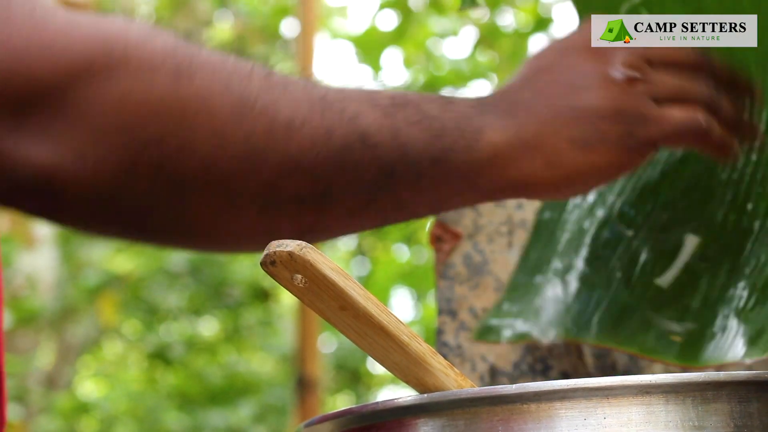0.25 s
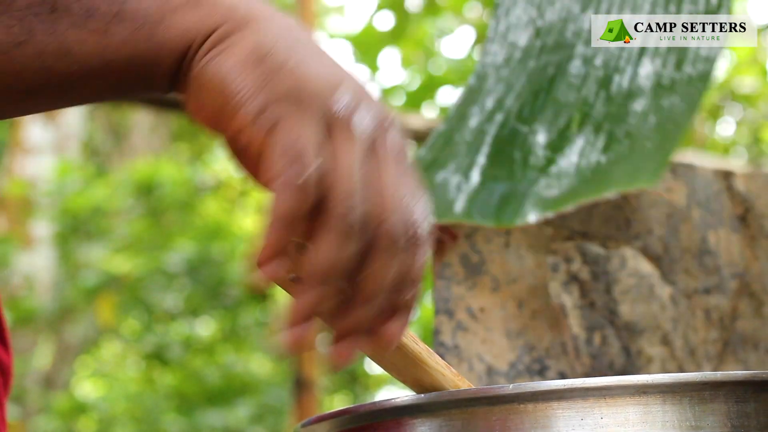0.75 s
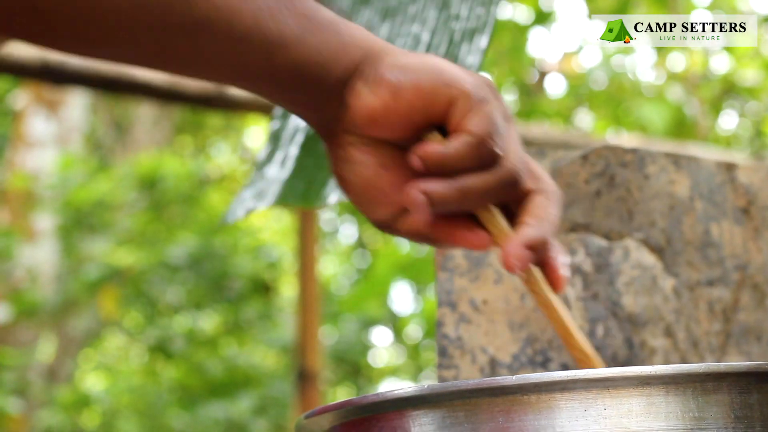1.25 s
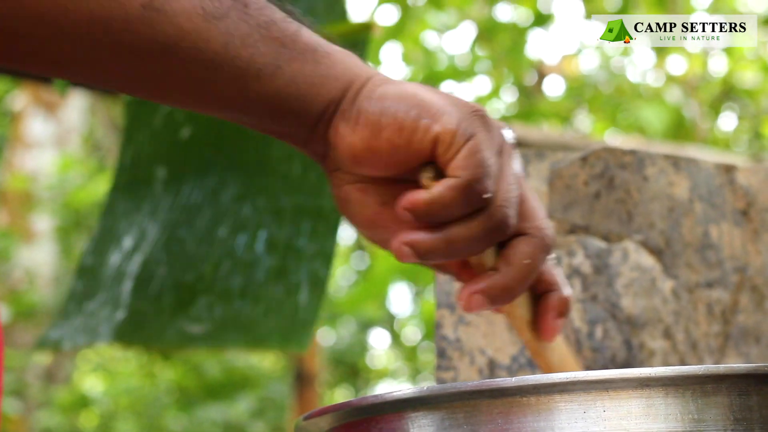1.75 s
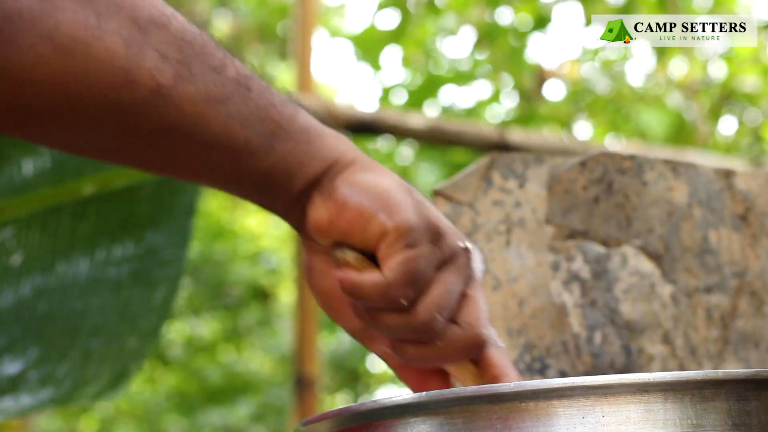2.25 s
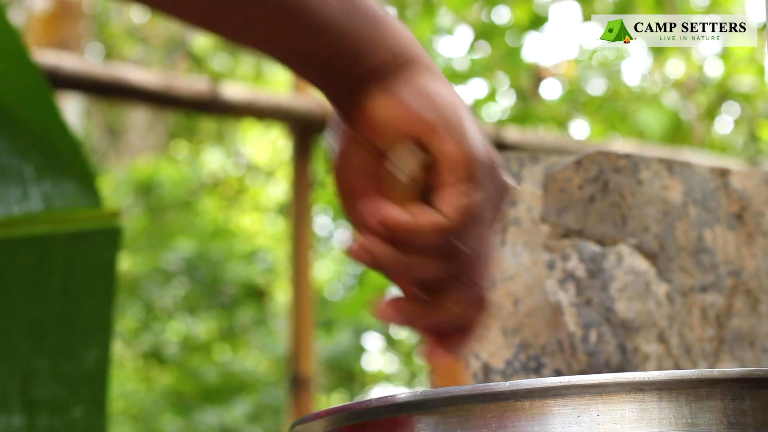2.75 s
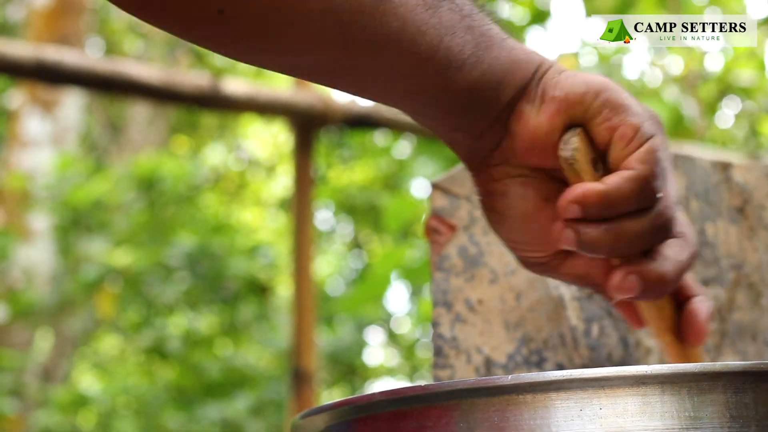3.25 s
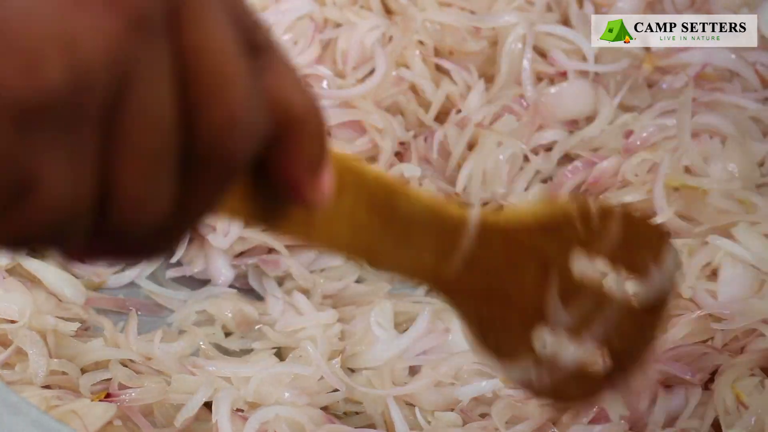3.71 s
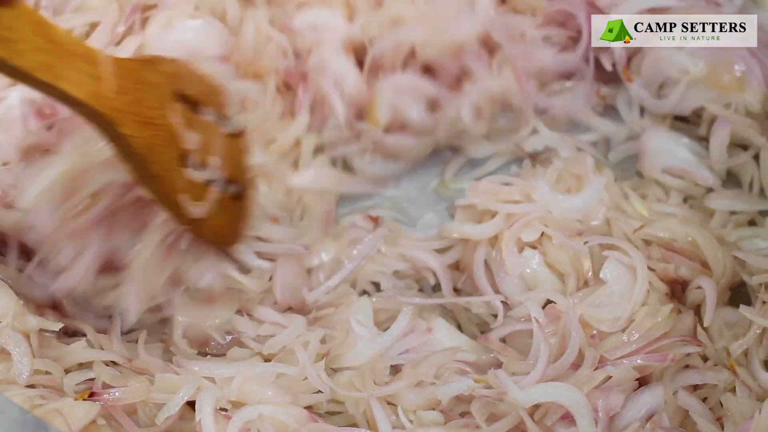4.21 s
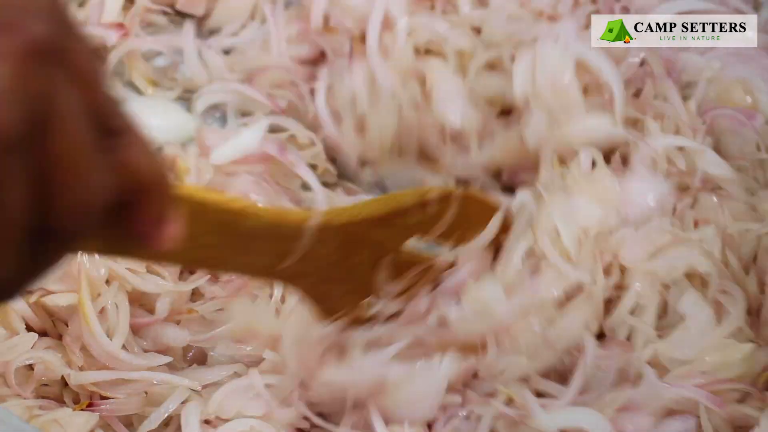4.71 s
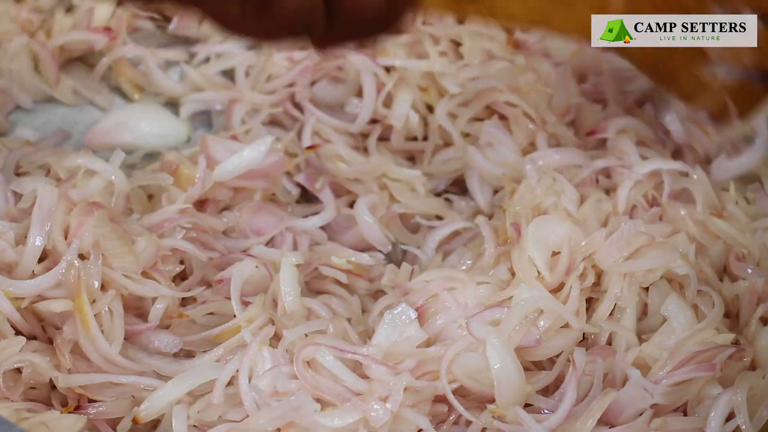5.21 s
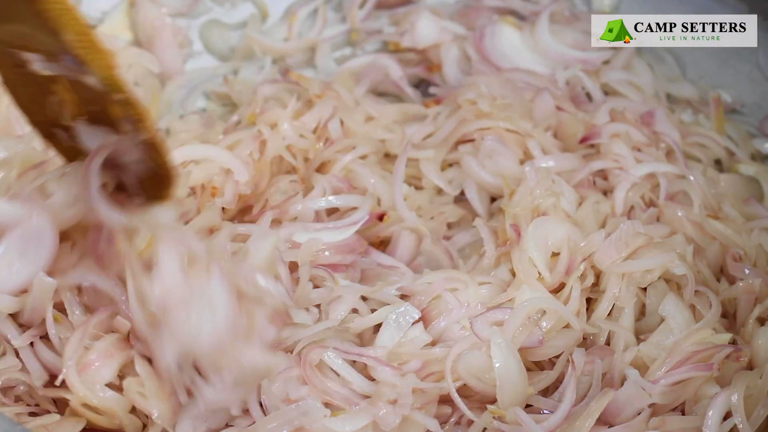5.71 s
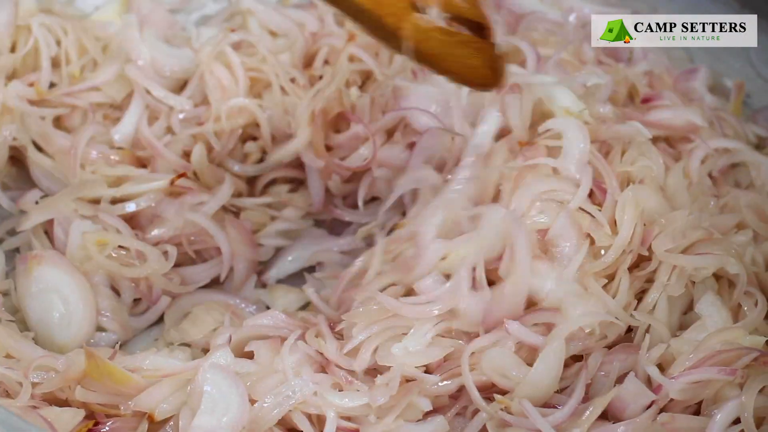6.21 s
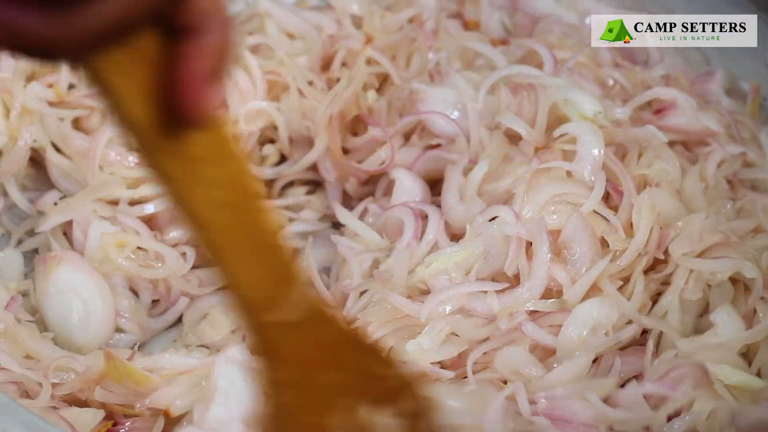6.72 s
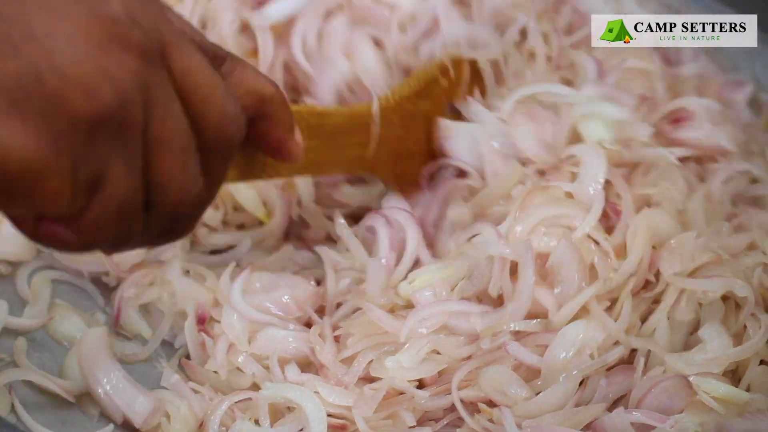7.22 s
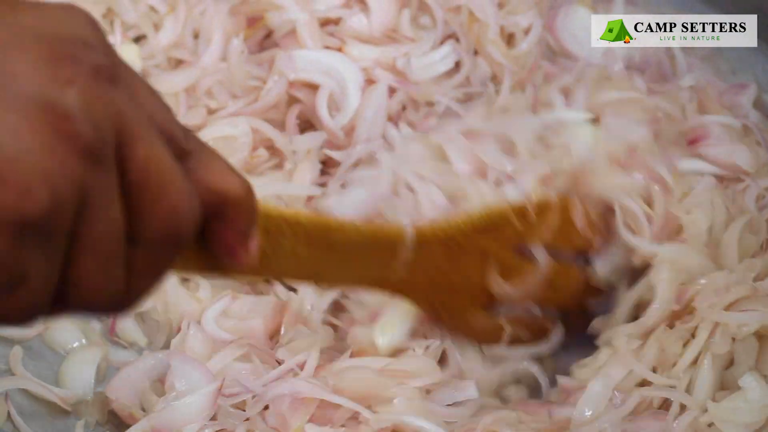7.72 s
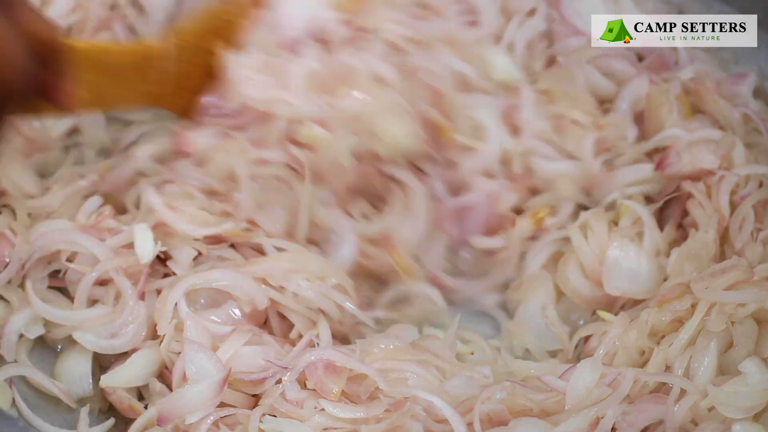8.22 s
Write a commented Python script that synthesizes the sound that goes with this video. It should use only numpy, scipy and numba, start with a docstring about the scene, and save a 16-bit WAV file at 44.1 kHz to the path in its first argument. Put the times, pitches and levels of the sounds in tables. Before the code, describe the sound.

Fierce bright sizzle of onions in hot oil with sharp ringing spits and wooden spatula scrapes, then an abrupt cut to a quieter, duller sizzle.

```python
"""A fierce, bright sizzle: sliced onions hit hot oil in a wide metal pan outdoors.
Thousands of short ringing bubbles over a noise hiss make the sizzle, and low filtered noise the open air.
A wooden spatula scrapes (swells of the lowest band) and knocks (ringing pan modes); loud spits ring out.
A hard cut leads to a second shot: a calmer, duller sizzle under a heap of onions."""
import sys
import numpy as np
from scipy import signal
from scipy.fft import rfft, irfft
from scipy.io import wavfile
from scipy.ndimage import uniform_filter1d
from numba import njit

SR = 44100
rng = np.random.default_rng(int(sys.argv[2]) if len(sys.argv) > 2 else 0)


def volts_from_decibels(level):
    """Turn decibel levels (scalar or array-like) into linear amplitude factors."""
    exponent = np.asarray(level, float) / 20
    return 10 ** exponent


def transcribe(signal):
    """Save signal, clipped to [-1, 1], as a 16-bit WAV file at the path in sys.argv[1]."""
    frames = np.atleast_2d(signal).T
    limited = np.clip(frames, -1, 1)
    pcm = np.round(limited * 32767).astype(np.int16)
    wavfile.write(sys.argv[1], SR, pcm)


N = 373086


def level(x, db):
    """Scale a sound to an rms (average) level in dB."""
    return x * volts_from_decibels(db) / np.sqrt(np.mean(x ** 2))


def colour(x, table):
    """Filter a sound by (Hz, dB) points joined on a logarithmic pitch axis."""
    hz, db = np.transpose(table)
    f = np.fft.rfftfreq(len(x), 1 / SR) + 1
    gain_db = np.interp(np.log(f), np.log(hz), db)
    return irfft(rfft(x) * volts_from_decibels(gain_db), len(x))


def walk(n, rate):
    """Random levels, each held for 1 / rate seconds, with the jumps smoothed twice."""
    hold = int(SR / rate)
    steps = np.repeat(rng.standard_normal(n // hold + 1), hold)
    return uniform_filter1d(uniform_filter1d(steps, hold), hold)[:n]


def curve(t, rows):
    """Join (seconds, dB) points by straight lines."""
    return np.interp(t, *np.transpose(rows))


def around_mean(t, rows):
    """The same curve, shifted so that its average is 0 dB."""
    db = curve(t, rows)
    return db - np.mean(db)


@njit
def rings(n, start, hz, cycles, size, glide, swell):
    """Sines that swell, lose 8.7 dB every `cycles` turns and meanwhile rise in pitch by the share `glide`."""
    out = np.zeros(n)
    for g in range(len(start)):
        w = 2 * np.pi * hz[g] / SR
        life = cycles[g] * SR / hz[g]  # samples
        # a shrinking, turning arrow z: p turns it each sample, dp speeds up the turning
        z, p, dp = size[g] + 0j, np.exp(1j * w - 1 / life), np.exp(1j * w * glide / life)
        shut, opening = 1., np.exp(-1 / (swell * life))
        for i in range(start[g], min(n, start[g] + int(4 * life))):
            shut *= opening
            out[i] += z.imag * (1 - shut)
            z *= p
            p *= dp
    return out


def scrapes(t):
    """The spatula drags along the pan: swells in dB that rise fast and fade."""
    # Each row: start in seconds, swell in dB before rise and fade, fade time in seconds.
    drags = [(0, 12.5, 0.11), (.36, 6.5, 0.27), (.85, 11.5, 0.39), (1.58, 4, 0.49), (2.15, 5.5, 0.51),
             (2.78, 15, 0.13), (2.95, 2, .2), (3.2, 5.5, 0.22), (5.24, 7, .08), (5.98, 4, .08),
             (7.6, 1.5, 0.27)]
    rise_s = 0.017
    swell_db = np.zeros(len(t))
    for s, db, fade_s in drags:
        since = np.maximum(t - s, 0)
        swell_db += db * (1 - np.exp(-since / rise_s)) * np.exp(-(since / fade_s) ** 2)
    return swell_db


def boiling(shot, t):
    """The boil in dB: in shot two it swells as strokes turn wet onion onto hot metal."""
    # Shot one, onions dropping in. Each row: time in seconds, level in dB (only its ups and downs count).
    dropping_in = [(0.0, -25.5), (0.13, -23), (0.52, -24), (0.79, -21), (1.07, -24), (1.19, -20.5),
                   (1.33, -21.5), (1.38, -24), (1.74, -21), (1.86, -24), (1.97, -21.5), (2.09, -26),
                   (2.16, -21), (2.42, -25), (2.48, -22), (2.52, -23), (2.83, -21.5), (2.85, -24.5),
                   (3.15, -20.5), (3.4, -22.5)]
    # Shot two. Each row: middle of a stroke in seconds, its length in seconds, swell in dB.
    strokes = [(3.56, 0.13, 6.5), (4.16, 0.18, 4), (4.685, 0.35, 5.5), (5.06, 0.14, 2.5), (5.626, 0.43, 4),
               (6.01, 0.24, 5.5), (6.237, .1, 2.5), (6.574, 0.12, 1.5), (6.823, 0.15, 2), (7.014, 0.11, 4),
               (7.40, 0.24, 3), (7.824, 0.21, 4), (8.35, 0.16, 3.5)]
    if not shot:
        return around_mean(t, dropping_in)
    return sum(db * np.exp(-4 * ((t - s) / length) ** 2) for s, length, db in strokes)


def band_levels(shot, t):
    """Each band follows the boil and the fizz by its own shares; scrapes lift the lowest."""
    # Fizz above 4.6 kHz, one list per shot. Each row: time in seconds, level in dB (only ups and downs count).
    fizzing = [
        [(0.0, -18.5), (0.07, -16), (0.31, -18), (0.32, -16.5), (0.57, -21), (0.6, -17.5), (1.32, -16.5),
         (1.39, -21.5), (1.45, -18), (2.04, -17), (2.08, -22), (2.17, -15), (2.48, -20.5), (2.79, -20),
         (2.86, -22.5), (3.05, -16), (3.08, -18), (3.23, -15.5), (3.37, -21.5), (3.4, -20.5)],
        [(3.42, -44), (3.57, -36), (3.71, -43.5), (4.77, -40.5), (4.92, -45), (5.16, -44), (5.65, -42.5),
         (5.76, -47.5), (6.14, -43), (6.17, -46.5), (7.07, -44.5), (7.1, -46.5), (7.21, -43), (7.46, -44),
         (7.5, -46.5), (7.7, -46.5), (7.78, -40.5), (8.09, -46.5), (8.39, -42), (8.46, -49)],
    ]
    # One list per shot, bands from low to high. Each row: resting level in dB, dB per dB of boil,
    # dB per dB of fizz.
    band_shares = [
        [(-46.5, .2, 0.47), (-35, 0.94, .1), (-23, 1.25, -0.02), (-20.5, -0.04, 0.98), (-28.5, -0.44, 1.2)],
        [(-54.5, 0.13, 0.2), (-51, 0.74, 0), (-38, 0.87, 0.18), (-39.5, 0.05, 0.86), (-61, -1, 0.5),
         (-74.5, 0, 1.1)],
    ]
    # Topmost band of shot one. Each row: time in seconds, level in dB.
    topmost = [(0.0, -37), (0.07, -34), (0.56, -37), (0.59, -33), (0.94, -36), (0.96, -28), (1.36, -33),
               (1.4, -40), (1.47, -33.5), (2.31, -34), (2.47, -40), (2.79, -38), (2.85, -43), (2.98, -32),
               (3.39, -38), (3.4, -32.5)]
    boil = boiling(shot, t)
    fizz = around_mean(t, fizzing[shot])
    levels = [db + by_boil * boil + by_fizz * fizz for db, by_boil, by_fizz in band_shares[shot]]
    if not shot:
        levels.append(curve(t, topmost))
    levels[0] = levels[0] + scrapes(t)
    return levels


def sizzle(shot, layers_db):
    """Bubbles of all sizes burst over escaping steam; stirring shifts the share of big and small ones."""
    # Lower edges of the six bands in Hz.
    band_edges = [300, 750, 1500, 4600, 9500, 12500]
    # Colour of each shot's sizzle, with the top of shot two closed off near 15 kHz, one list per shot.
    # Each row: pitch in Hz, gain in dB before the bands are levelled.
    tints = [
        [(200, -19), (330, -20), (530, -13.5), (1020, -7.5), (1200, -3.5), (1550, -5), (2060, -1.5), (2460, -3),
         (3130, -1), (4540, -2.5), (8760, 1), (11000, -5.5), (13000, -12.5), (15900, -17.5)],
        [(200, -25), (300, -11.5), (1100, -15.5), (1300, -13), (1450, -14), (1800, -7.5), (2200, -8),
         (2600, -1.5), (3000, -6.5), (4500, -14), (6200, -5.5), (7200, -10), (8500, -11.5), (9500, -23.5),
         (12500, -36.5), (15000, -50), (15250, -80)],
    ]
    # One row per shot: bubbles per second, cycles at 3 kHz before random spread, size spread in dB,
    # hiss in dB relative to the bubbles, flicker depth in dB before smoothing.
    bursting = [(5760, 8, 2, 1, 0.97), (5780, 8.6, 1.5, 4, 0)]
    rate, cycles, spread_db, hiss_db, flicker_db = bursting[shot]
    n = len(layers_db[0])
    chance = rng.random((int(rate * n / SR), 4)).T
    start = (chance[0] * n).astype(np.int64)
    hz = 300 + 16000 * chance[1]
    # small bubbles ring shorter, so louder for equal energy
    size = np.sqrt(hz) * volts_from_decibels(spread_db * np.minimum(-np.log(1 - chance[2]), 5))
    # from dry ticks to clear pings
    turns = cycles * (hz / 3000) ** 0.34 * volts_from_decibels(26.4 * (chance[3] - 0.8))
    bubbles = rings(n, start, hz, turns, size / turns ** 0.35, 0.0012, 0.22)
    hiss = level(rng.standard_normal(n), hiss_db)
    mix = colour(level(bubbles, 0) + hiss, tints[shot])

    spectrum, f = rfft(mix), np.fft.rfftfreq(n, 1 / SR) + 1
    above = [1 / (1 + (edge / f) ** 12) for edge in band_edges] + [0]
    flicker = flicker_db * walk(n, 60)  # the crackle of shot one flickers quickly and at random
    out = 0
    for k, db in enumerate(layers_db):
        part = level(irfft(spectrum * (above[k] - above[k + 1]), n), 0)
        # each band also drifts by itself, slowly and faster (dB before smoothing)
        drift = 0.88 * walk(n, 9) + 0.43 * walk(n, 29.99)
        out = out + part * volts_from_decibels(db + flicker + drift)
    return out


def open_air(shot, lowest_db):
    """Open air and fire: low filtered noise that wavers; the pan rumbles along under the spatula."""
    # One list per shot. Each row: pitch in Hz, gain in dB before levelling.
    air_tints = [
        [(15, -41), (25, -24), (54, -6), (124, -4), (208, -6.5), (300, -4.5), (390, -18), (660, -120)],
        [(15, -53), (25, -23), (59, -19), (86, -12), (177, -9), (300, -2), (390, -30), (660, -120)],
    ]
    # One per shot: rms level in dB before wavering and rumble.
    air_levels = [-49.5, -60.5]
    # One per shot: dB of rumble per dB of the sizzle's lowest band.
    rumble_shares = [0.5, .3]
    n = len(lowest_db)
    rumble_db = rumble_shares[shot] * (lowest_db - np.mean(lowest_db))
    air = level(colour(rng.standard_normal(n), air_tints[shot]), air_levels[shot])
    return air * volts_from_decibels(1.5 * walk(n, 4) + rumble_db)


def spits():
    """A drop of onion juice explodes in the oil: a ringing bubble and two weaker neighbours."""
    # Each row: start in seconds, level in dB before the swell, pitch in Hz, cycles per 8.7 dB of decay.
    drops = [(0.173, 3, 7900, 10), (0.2384, 4.5, 8930, 9.7), (0.3264, -7, 8000, 11), (0.3374, -2, 7540, 11),
             (0.3755, 3, 7700, 9), (0.8254, -12, 2120, 16), (0.9044, -12, 1735, 15),
             (1.7074, -11, 2120, 9.2), (1.7344, -10, 8900, 10), (1.7464, -6, 2060, 6),
             (2.0867, 1.5, 8700, 9.1), (2.1495, 3, 8550, 11), (2.171, 0, 6260, 10), (2.2024, -3, 8700, 9),
             (2.298, -1, 5900, 14), (2.365, 0, 8450, 8.1), (2.4813, 2, 3900, 7), (2.5594, -11, 2090, 11),
             (2.624, -12.5, 1134, 7.4), (2.6534, -2, 3160, 15), (2.6934, -4, 2060, 3),
             (2.802, -2, 2070, 5.5), (2.9294, -12, 2080, 9.1), (3.269, -1, 5110, 10),
             (5.5039, -12.5, 2490, 8), (5.9638, -13, 2460, 8), (6.0237, -15, 2700, 11),
             (6.25, -21, 2050, 12), (6.563, -19, 2500, 10), (7.0025, -18, 2900, 5),
             (7.0045, -14.5, 1950, 5), (7.3844, -19, 2800, 8), (7.431, -23, 2760, 9),
             (7.7994, -19, 2640, 10)]
    s, db, hz, cycles = np.transpose(drops)
    out = rings(N, (s * SR).astype(np.int64), hz, cycles, volts_from_decibels(db), 0.0017, 1.0)
    chance = rng.random((len(s), 4)).T
    for lag, pitch in (chance[:2], chance[2:]):
        start = ((s + 0.0016 * lag) * SR).astype(np.int64)  # up to 1.6 ms later
        near_hz = hz * (0.75 + 0.6 * pitch)
        out = out + rings(N, start, near_hz, 0.73 * cycles, volts_from_decibels(db - 13), 0.002, 0.46)
    return out


def knocks():
    """Wood on onion-damped metal: a push rings the pan's modes; hardness brings out the upper ones.

    Each blow has its own amount of woody crack, a short burst of filtered noise."""
    # Ways the pan rings. Each row: pitch in Hz, level in dB, time to fade by 60 dB in seconds.
    pan_modes = [(170, -22, 0.086), (271, -15, 0.086), (387.6, 2.5, 0.073), (425, -4, 0.065),
                 (566, -5, 0.05), (683, -3.5, 0.044), (814, -9, 0.055), (1256, -8, 0.05), (2150, -11, .04)]
    # Each row: start in seconds, level in dB of ring and crack together, hardness in dB per octave,
    # rise time of the push in ms, crack in dB before filtering and fading.
    blows = [(.847, -19, 7.5, 4.4, 9), (0.911, -20, -4, 6.4, -6), (1.704, -32, -4, 4.3, 0.5),
             (1.73, -28, -3, 4, 0.5), (1.76, -22.5, 2, 5, -6), (2.778, -19, 1, 3, -9),
             (5.23, -35, -1, 3.3, -6), (5.255, -35.5, 0, 3.5, -6), (7.002, -39, -7, 3, 14),
             (7.641, -44, 10.5, 3.4, 7), (7.662, -41, -19, 3.9, -6), (7.852, -41, -10, 5.3, 3)]
    hz, db, t60 = np.transpose(pan_modes)
    t = np.arange(int(0.2 * SR)) / SR
    modes = np.sin(2 * np.pi * hz[:, None] * t) * np.exp(-np.log(1000) * t / t60[:, None])
    wood = signal.butter(2, [900, 4000], "bandpass", fs=SR, output="sos")
    out = np.zeros(N)
    for s, blow_db, hard_db, push_ms, crack_db in blows:
        # hardness tilts the modes around the third one; each blow also differs by chance
        tilt_db = hard_db * np.log2(hz / hz[2])
        gains = volts_from_decibels(db + tilt_db + 1.2 * rng.standard_normal(len(hz)))
        ring = gains @ modes * (1 - np.exp(-1000 * t / max(push_ms, 0.2)))
        noise = signal.sosfilt(wood, rng.standard_normal(len(t)))
        crack = volts_from_decibels(crack_db) * noise * np.exp(-t / 0.0032)
        first = int(s * SR)
        out[first:first + len(t)] += volts_from_decibels(blow_db) * (ring + crack)
    return out


def scene():
    """Each shot has its own sizzle and air, joined without a fade; spits and knocks go on top."""
    cut = int(3.4066 * SR)  # seconds to samples
    shots = []
    for shot, (start, n) in enumerate([(0, cut), (cut, N - cut)]):
        levels = band_levels(shot, (start + np.arange(n)) / SR)
        shots.append(sizzle(shot, levels) + open_air(shot, levels[0]))
    return (np.concatenate(shots) + spits() + knocks())[None]


def top_cut(x):
    """Nothing passes above the cut-off."""
    return signal.sosfilt(signal.butter(12, 15745, fs=SR, output="sos"), x)


def record(dry):
    """The camera takes in the finished mix."""
    return top_cut(dry)


dry = scene()
out = record(dry)
transcribe(out)
```